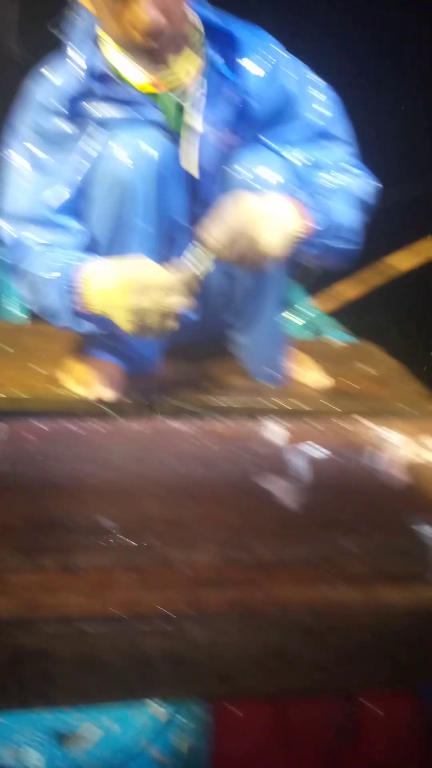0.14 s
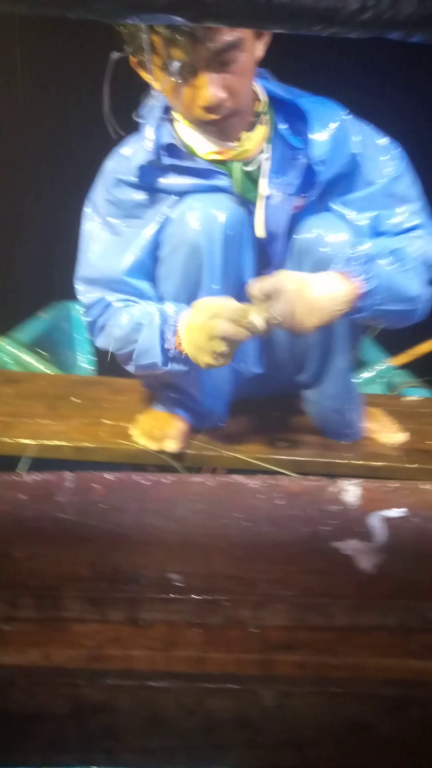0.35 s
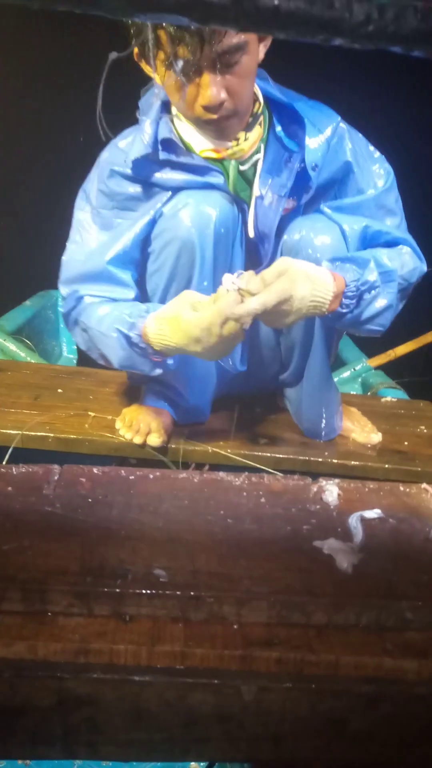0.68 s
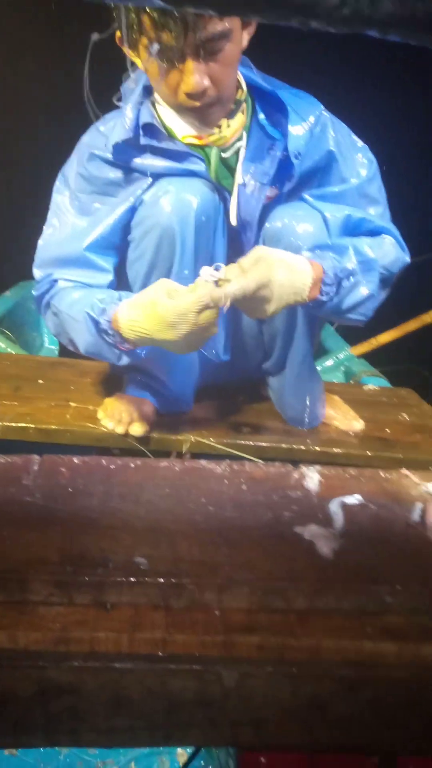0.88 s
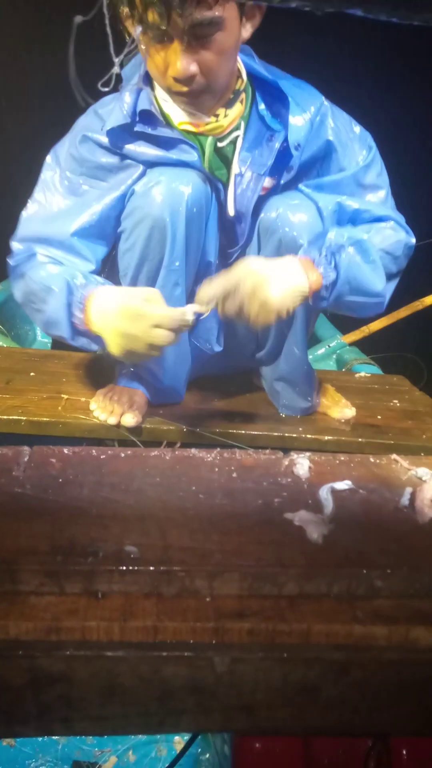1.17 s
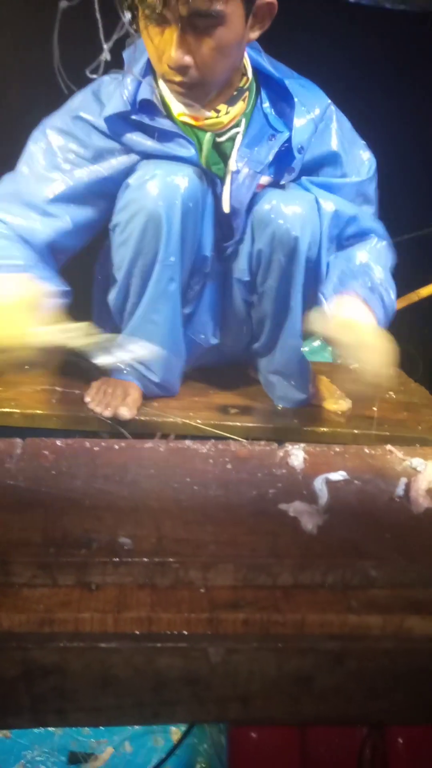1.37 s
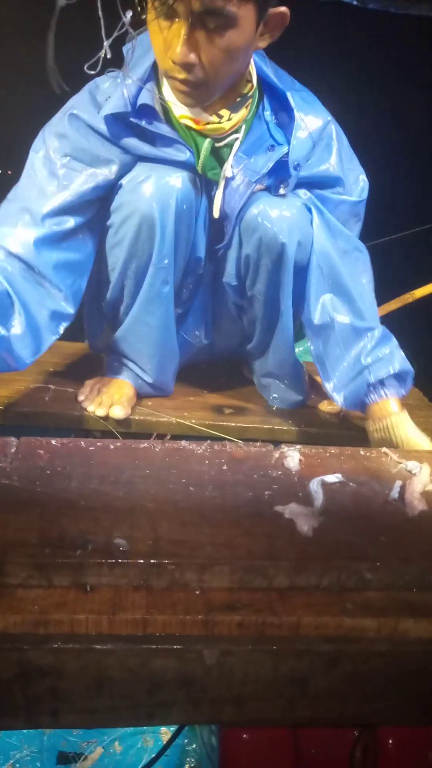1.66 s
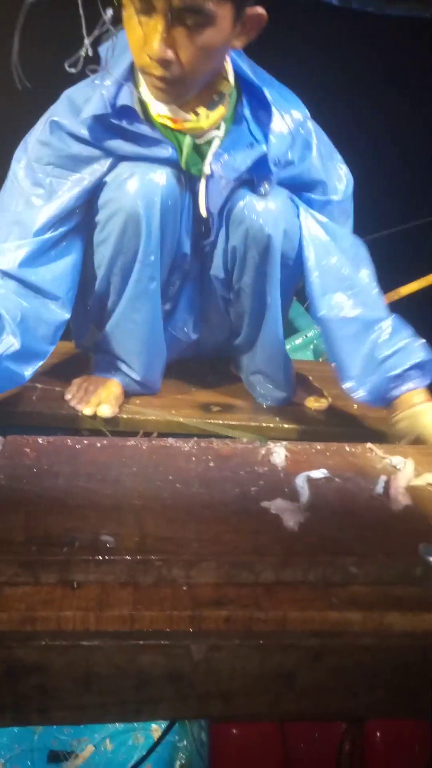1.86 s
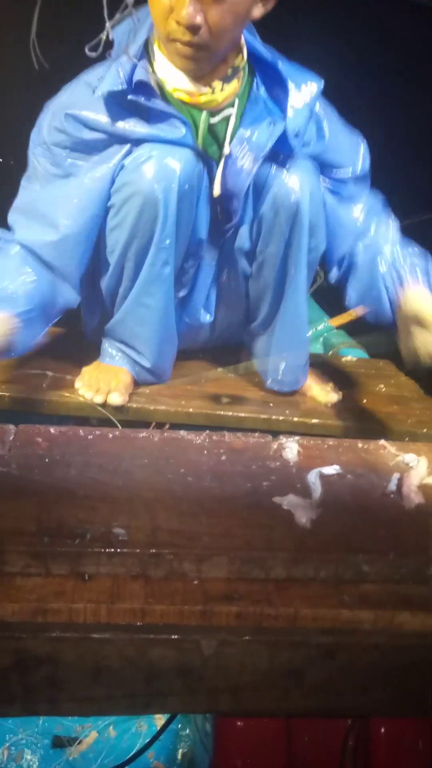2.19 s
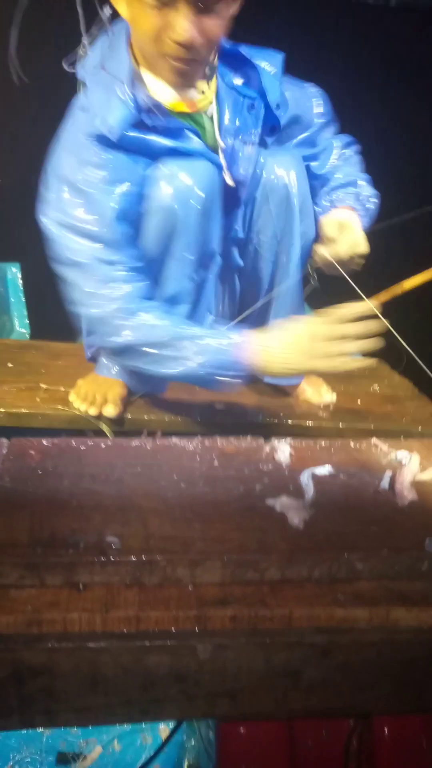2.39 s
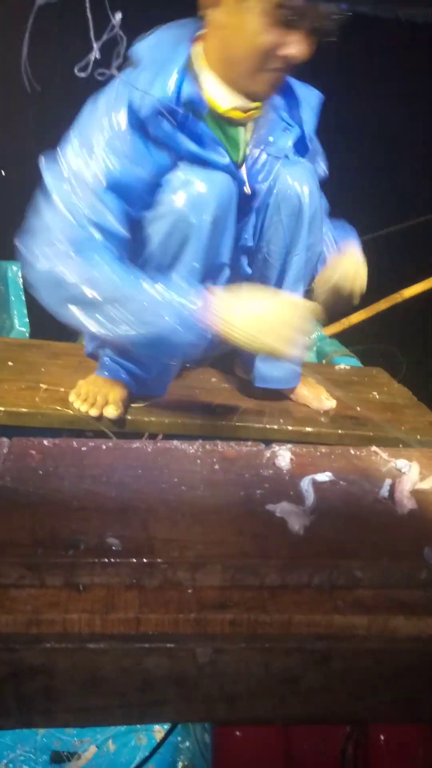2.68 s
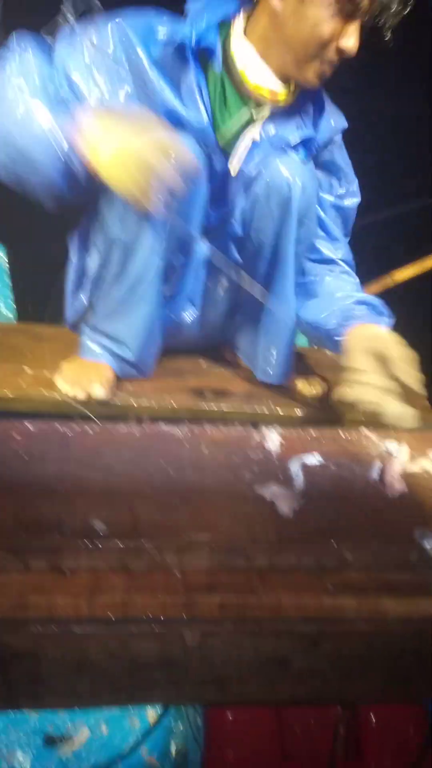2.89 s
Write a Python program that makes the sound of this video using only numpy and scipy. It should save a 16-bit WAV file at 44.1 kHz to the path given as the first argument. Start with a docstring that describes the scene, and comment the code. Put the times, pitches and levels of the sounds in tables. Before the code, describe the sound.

Small diesel boat engine thrums steadily and loudly, with faint raincoat rustles and line zips.

```python
"""Small diesel on a wooden fishing boat

A small four-stroke diesel runs steadily a few metres from a phone. Its exhaust thrums in low orders of the
two-turn cycle, the muffler gives rounded pops, knocks ring the block and valves hiss once a turn.
Broad engine and water noise flickers in octave bands; a second machine adds a faint low sine hum.
A raincoat rustles in bursts of coloured noise, and a fishing line zips through gloved hands as pitched fuzz.
"""
import sys
import numpy as np
from scipy import signal
from scipy.fft import rfft, irfft
from scipy.io import wavfile
from scipy.ndimage import uniform_filter1d

SR = 44100
rng = np.random.default_rng(int(sys.argv[2]) if len(sys.argv) > 2 else 0)


def log_audio(samples):
    """Write samples as a 16-bit WAV file to the path given in sys.argv[1]."""
    # one column per channel
    frames = np.atleast_2d(samples).T
    # limit to full scale, then quantise
    limited = np.clip(frames, -1, 1)
    pcm = np.round(limited * 32767).astype(np.int16)
    wavfile.write(sys.argv[1], SR, pcm)


N = 134505  # samples

# Crankshaft speed: (time [s], speed [rpm])
ENGINE_SPEED = [(0.0, 2501.0), (0.2, 2444.5), (0.4, 2427.0), (0.6, 2461.5), (0.8, 2505.0), (1.1, 2493.0),
                (1.4, 2478.0), (1.7, 2494.0), (2.0, 2477.5), (2.2, 2503.5), (2.4, 2451.5), (2.6, 2484.5),
                (2.8, 2444.5), (3.05, 2424.5)]
START_CYCLE = .147  # place in the two-turn cycle at the start, 0-1

# Second machine's hum: pitch [Hz], rms level [dB]
HUM_HZ, HUM_DB = 58.6, -39

# Spectrum of the broad engine and water noise: (frequency [Hz], density [dB per Hz])
ROAR_COLOUR = [(25, -23), (60, -1), (110, 4), (200, -7.5), (330, -9.5), (500, -10.5), (740, -13.5),
               (900, -14), (1050, -11.5), (1250, -12), (1420, -14), (1620, -16.5), (1800, -16), (2050, -18),
               (2500, -16), (3400, -24), (4400, -24.5), (6400, -23), (7200, -31.5), (10000, -40),
               (12500, -55), (13800, -49), (15200, -47), (16000, -41)]
# Low middle of the roar, heard relative to the reference: (time [s], level [dB])
LOW_MID_LEVEL = [(0.0, -44.5), (0.4, -37), (0.59, -40), (0.95, -43.5), (1.21, -45.5), (3.05, -38)]
LOW_MID_REF_DB = -41
ROAR_DB, SWELL_DB = -33, .4
FLICKER_DB, TOP_FLICKER_DB = .5, 2.5  # the top octave flickers more
THROB_DB, THROB_PLACE, THROB_FROM_HZ = 2.5, .41, 7500  # top of the roar beats once a cycle

# Raincoat rustles: (peak time [s], rise [s], fall [s], gain [dB])
RUSTLE_BURSTS = [(.13, 0.023, 0.028, -36.5), (.4, .01, .01, -61), (.78, 0.018, 0.017, -37.5),
                 (1.02, 0.024, 0.013, -37.5), (1.935, .02, 0.018, -46), (2.075, 0.017, 0.027, -35.5),
                 (2.345, 0.085, 0.075, -36.5), (2.85, .01, .02, -60)]
# Spectrum of the rustles: (frequency [Hz], density [dB per Hz])
RUSTLE_SPECTRUM = [(300, -9), (700, 5), (2500, 0), (5000, -5), (9000, -18), (12500, -33), (16000, -27)]
RUSTLE_GRAIN_DB = 2.

# Line zips: (peak time [s], rise [s], start pitch [Hz], pitch at peak [Hz],
#             noise width [share of pitch], gain [dB])
LINE_ZIPS = [(.564, .012, 6800, 8200, .2, -45), (1.94, .02, 8000, 9500, .4, -52),
             (2.082, .025, 2000, 2200, 1.1, -39.5), (2.27, .05, 5200, 5200, .7, -45),
             (2.372, .06, 3200, 6800, 1.1, -37), (2.575, .012, 14500, 14500, .25, -59),
             (1.495, .015, 15000, 15000, .15, -62)]
ZIP_FALL_S = .0088
# Spectrum of the line's snap: (frequency [Hz], density [dB per Hz])
SNAP_SPECTRUM = [(3500, -33), (5200, -10), (6200, 6), (7300, -4.5), (8600, -11.5), (10500, -24),
                 (13000, -22), (15300, -17), (16000, -13)]
SNAP_S, SNAP_RISE_S, SNAP_FALL_S, SNAP_DB = 2.3815, .0037, .005, -23

# Valve hisses: (place in the cycle [0-1], level [dB])
VALVE_PLACES = [(.35, 2.5), (.85, 3.5)]
# Spectrum of the valve hiss: (frequency [Hz], density [dB per Hz])
VALVE_SPECTRUM = [(2000, -5), (3200, -6), (4400, -11.5), (5300, -0.5), (6200, -2), (6550, 2.5), (6900, -7),
                  (7400, -14.5), (9500, -20), (12000, -32.5), (16000, -36)]
# Slow change of the valve hiss: (time [s], level [dB])
VALVE_DRIFT = [(0, -1), (.7, -1.5), (1.4, -2.5), (2.2, -2), (2.5, 1.5), (3.05, 2.5)]
VALVE_DB = -45.3  # rms before the slow change
VALVE_RISE_S, VALVE_DECAY_S = .0008, .0065
VALVE_SCATTER_DB, VALVE_JITTER_S = 1.3, .0005

# Combustion and linkage knocks: (place in the cycle [0-1], level [dB])
KNOCK_PLACES = [(.45, -0.5), (.97, 3.5), (.15, -20), (0.7, 5), (.83, -3)]
# Ringing modes of the engine block: (frequency [Hz], level [dB], 60 dB decay time [s])
BLOCK_MODES = [(500, -6, .08), (600, -7, .08), (920, -6, .06), (1090, -6, .08), (1222, 0, .09),
               (1325, -1, .07), (1535, -2, .08), (1655, -7, .08), (2400, -3, .015)]
KNOCK_DB, KNOCK_SCATTER_DB, KNOCK_JITTER_S = -43, 1.5, .00006

# Muffler pops: (place in the cycle [0-1], level [dB])
POP_PLACES = [(.53, 0), (.0175, -8), (.7, -14)]
# Slow change of the pops: (time [s], level [dB])
POP_DRIFT = [(0, -0.5), (.5, 0.5), (1.3, -1), (1.7, 3), (2.3, 0.5), (2.7, -0.5), (3.05, 0)]
POP_HZ, POP_WIDTH_S = 820, .0043
POP_DB = -44.5  # rms before the slow change
POP_SCATTER_DB, POP_JITTER_S = 1.8, .00008

# Exhaust thrum: (order of the two-turn cycle [number], level [dB])
EXHAUST_ORDERS = [(1, -54), (2, -0.5), (3, -15.5), (4, -0.5), (5, -11), (6, -15.5), (7, -13.5), (8, -14),
                  (9, -18.5), (10, -34.5), (11, -22), (12, -20.5), (13, -23.5), (14, -32.5), (15, -32.5),
                  (16, -35), (17, -31.5), (18, -34.5), (19, -38.5), (20, -30.5), (21, -38.5), (22, -32),
                  (23, -39.5), (24, -37)]
EXHAUST_DB = -19.5  # rms of a 0 dB order
WAVER, WAVER_GROWTH = .12, .032  # random share of an order, its growth per dB of weakness
WAVER_PER_S = 4.5
LAG_RAD, SPREAD_RAD, ODD_LAG_RAD = .95, .21, .45  # higher and odd orders leave the pipe later

TOP_HZ = 15800  # where the phone cuts the treble


def undb(db):
    """Turn dB into gain."""
    return 10 ** (np.asarray(db) / 20)


def level(x, db):
    """Scale to an rms level."""
    return x * undb(db) / np.sqrt(np.mean(x ** 2))


def curve(table, at):
    """Draw straight lines through the rows."""
    return np.interp(at, *np.array(table, float).T)


def walk(rate):
    """Random levels held 1 / rate seconds and slewed twice; spread near 1."""
    k = int(SR / rate)
    steps = np.repeat(rng.standard_normal(N // k + 1), k)
    return 1.5 * uniform_filter1d(uniform_filter1d(steps, k), k)[:N]


def colour_db(table, hz):
    """Read a spectrum table on a log-frequency axis, near silent below its first row."""
    rows = np.array(table, float)
    return np.interp(np.log(hz), np.log(rows[:, 0]), rows[:, 1], left=-90)


def bin_hz():
    """Frequencies of the spectrum bins, nudged 1 Hz up to keep logs finite."""
    return np.arange(N // 2 + 1) * SR / N + 1


def coloured(table):
    """Noise of unit rms with the given spectrum."""
    white = rfft(rng.standard_normal(N))
    return level(irfft(white * undb(colour_db(table, bin_hz())), N), 0)


def burst(t, at, rise, fall):
    """Exponential rise to 1 and fall."""
    return np.exp(np.where(t < at, (t - at) / rise, (at - t) / fall))


def strikes(cycle, pattern, scatter_db, jitter_s):
    """An impulse each time the cycle passes a place of the pattern, scattered in level and time."""
    out = np.zeros(N)
    turns = np.arange(80)  # more cycles than the scene holds
    for place, db in pattern:
        chance = rng.standard_normal((80, 2))
        at = np.interp(turns + place, cycle, np.arange(N), right=-SR)
        at = at + jitter_s * SR * chance[:, 0]
        ok = (at > 0) & (at < N - 1)
        out[at[ok].astype(int)] += undb(db + scatter_db * chance[ok, 1])
    return out


def second_machine():
    """A faint sine hum whose pitch wanders slightly."""
    hz = HUM_HZ * (1 + .004 * walk(2.))
    return level(np.sin(2 * np.pi * np.cumsum(hz) / SR), HUM_DB)


def roar(cycle, t):
    """Broad engine and water noise in octave bands that swell together and flicker alone."""
    octaves_up = np.log2(bin_hz())
    spectrum = rfft(coloured(ROAR_COLOUR))
    swell = SWELL_DB * walk(2.05)
    throb = THROB_DB * np.cos(2 * np.pi * (cycle - THROB_PLACE))
    low_mid = curve(LOW_MID_LEVEL, t) - LOW_MID_REF_DB
    out = 0
    for octave in range(5, 15):  # centres 2 ** octave, 32 to 16384 Hz
        crossfade = np.cos(np.pi / 2 * np.clip(octaves_up - octave, -1, 1)) ** 2
        band = irfft(spectrum * crossfade, N)
        flicker = TOP_FLICKER_DB * walk(39.72) if octave == 14 else FLICKER_DB * walk(14.)
        gain_db = swell + flicker
        if 2 ** octave > THROB_FROM_HZ:
            gain_db = gain_db + throb
        if octave in (8, 9):
            gain_db = gain_db + low_mid
        out = out + band * undb(gain_db)
    return level(out, ROAR_DB)


def raincoat(t):
    """Wet clothing and gear rub in soft, grainy bursts of broad noise."""
    gate = sum(undb(db) * burst(t, at, rise, fall) for at, rise, fall, db in RUSTLE_BURSTS)
    grain = undb(RUSTLE_GRAIN_DB * walk(120.))
    return gate * grain * coloured(RUSTLE_SPECTRUM)


def fishing_line(t):
    """Line through gloves makes narrow or broad noise at a rising or steady pitch, with one snap."""
    out = undb(SNAP_DB) * burst(t, SNAP_S, SNAP_RISE_S, SNAP_FALL_S) * coloured(SNAP_SPECTRUM)
    for at, rise, hz0, hz1, width, db in LINE_ZIPS:
        # the glide runs a little past the peak
        hz = hz0 * (hz1 / hz0) ** np.clip(1 + (t - at) / rise, 0, 1.2)
        k = int(SR / hz1 / width) + 1
        fuzz = uniform_filter1d(rng.standard_normal((2, N)), k, axis=1)
        fuzz = uniform_filter1d(fuzz, k, axis=1) * np.sqrt(k)
        carrier = np.exp(2j * np.pi * np.cumsum(hz) / SR)
        tone = ((fuzz[0] + 1j * fuzz[1]) * carrier).real
        envelope = np.exp(-((t - at) / np.where(t < at, rise, ZIP_FALL_S)) ** 2)
        out = out + undb(db) * tone * envelope
    return out


def valves(cycle, t):
    """Gas past the valves puffs a sharp hiss once a turn."""
    age = np.arange(SR // 10) / SR
    puff = (1 - np.exp(-age / VALVE_RISE_S)) * np.exp(-age / VALVE_DECAY_S)
    hits = strikes(cycle, VALVE_PLACES, VALVE_SCATTER_DB, VALVE_JITTER_S)
    gate = signal.fftconvolve(hits, puff)[:N]
    return level(gate * coloured(VALVE_SPECTRUM), VALVE_DB) * undb(curve(VALVE_DRIFT, t))


def block(cycle):
    """Combustion and linkage knocks ring the decaying modes of the engine block."""
    age = np.arange(SR // 8) / SR
    ring = sum(undb(db) * np.sin(2 * np.pi * hz * age) * 1000 ** (-age / t60)
               for hz, db, t60 in BLOCK_MODES)
    hits = strikes(cycle, KNOCK_PLACES, KNOCK_SCATTER_DB, KNOCK_JITTER_S)
    return level(signal.fftconvolve(hits, ring)[:N], KNOCK_DB)


def muffler_pops(cycle, t):
    """Short rounded pops in the muffler at set places of the firing cycle."""
    age = np.arange(-600, 601) / SR
    pop = np.cos(2 * np.pi * POP_HZ * age) * np.exp(-(age / POP_WIDTH_S) ** 2)
    hits = strikes(cycle, POP_PLACES, POP_SCATTER_DB, POP_JITTER_S)
    return level(signal.fftconvolve(hits, pop, "same"), POP_DB) * undb(curve(POP_DRIFT, t))


def exhaust(cycle):
    """Exhaust tones locked to orders of the cycle; weak ones waver more in size and timing."""
    out = 0
    for order, db in EXHAUST_ORDERS:
        m = order - 2
        share = WAVER - WAVER_GROWTH * min(db, 0)
        wobble = 1 + share * (walk(WAVER_PER_S) + 1j * walk(WAVER_PER_S)) / 2
        lag = LAG_RAD * m + SPREAD_RAD * m * m + ODD_LAG_RAD * (m % 2)
        tone = wobble * np.exp(1j * (2 * np.pi * order * cycle - lag))
        out = out + level(tone.real, EXHAUST_DB + db)
    return out


def scene():
    """All sources together at the phone."""
    t = np.arange(N) / SR
    # one cycle is two turns, so rpm / 120 gives cycles per second
    cycle = START_CYCLE + np.cumsum(curve(ENGINE_SPEED, t)) / 120 / SR
    background = second_machine() + roar(cycle, t)
    handling = raincoat(t) + fishing_line(t)
    engine = valves(cycle, t) + block(cycle) + muffler_pops(cycle, t) + exhaust(cycle)
    return (background + handling + engine)[None]


def record(dry):
    """The phone cuts the top with a steep low-pass."""
    return signal.sosfilt(signal.ellip(14, .2, 80, TOP_HZ, fs=SR, output="sos"), dry)


dry = scene()
out = record(dry)
log_audio(out)
```